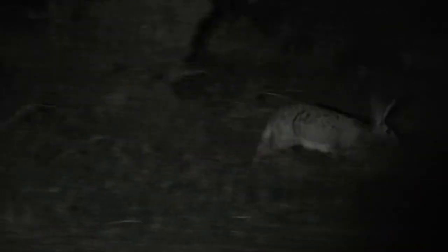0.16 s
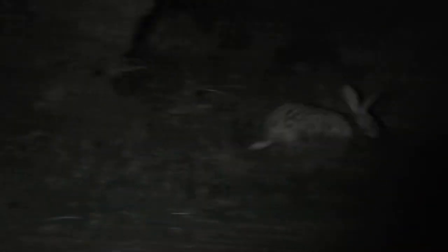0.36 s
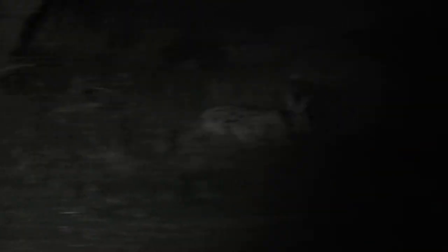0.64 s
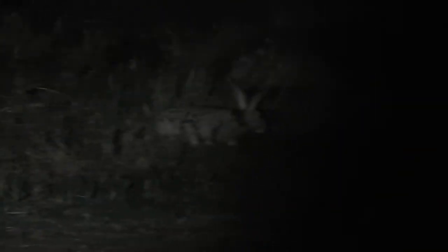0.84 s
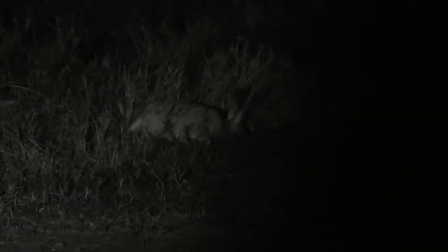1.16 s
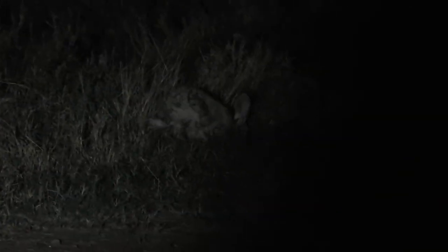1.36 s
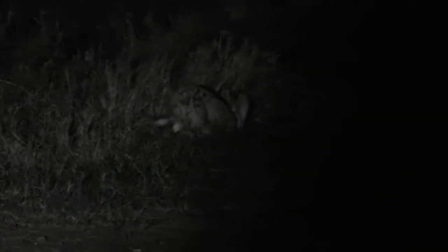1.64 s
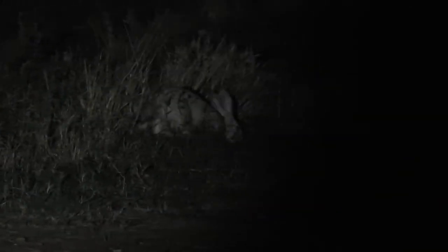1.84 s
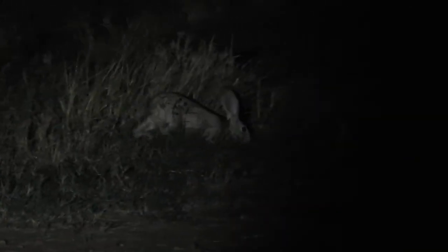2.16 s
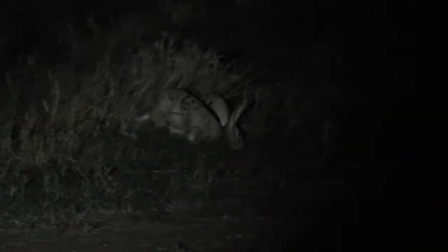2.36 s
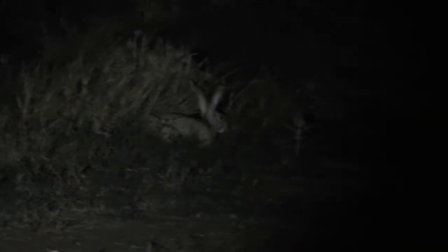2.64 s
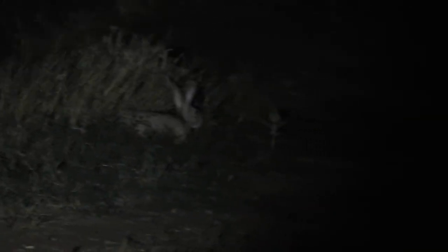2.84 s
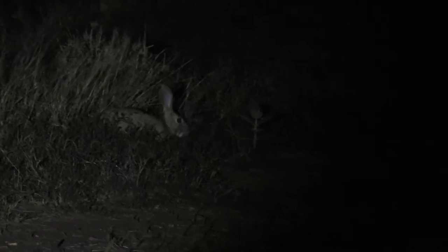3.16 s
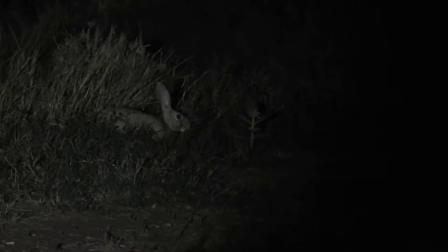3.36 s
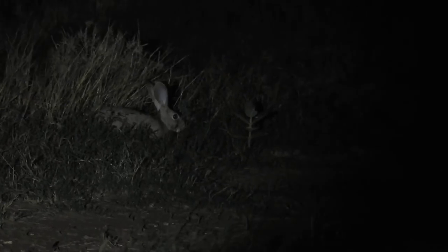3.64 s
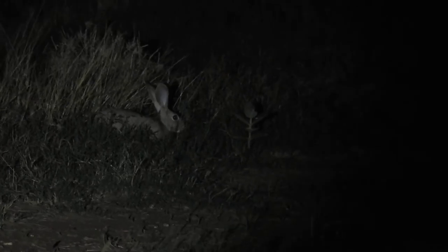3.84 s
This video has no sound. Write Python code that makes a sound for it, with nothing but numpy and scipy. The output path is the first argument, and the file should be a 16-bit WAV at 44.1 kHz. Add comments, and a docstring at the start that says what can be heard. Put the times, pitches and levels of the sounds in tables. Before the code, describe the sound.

Heavy crackling wind thuds on the microphone, with accelerating nightjar chirps and hissing night insects behind.

```python
"""Night in open grassland: from the start gusts buffet two microphone ports and overload them, while insects
hiss and tick in the grass (noise shaped in frequency, and short sagging tones). A nightjar's falling notes,
swept harmonics filtered by fixed throat resonances, speed up into a quick roll; thin squeaks, gliding sines,
come from far off meanwhile. A louder second series speeds up likewise, and one single note ends the scene.
The wind is noise rumble and flutter, with brief thuds and puffs, clipped softly and crackling."""
import sys
import numpy as np
from scipy import signal
from scipy.fft import rfft, irfft
from scipy.io import wavfile
from scipy.ndimage import uniform_filter1d

SR = 44100
rng = np.random.default_rng(int(sys.argv[2]) if len(sys.argv) > 2 else 0)


def bounce(signal):
    """Save signal as a 16-bit WAV file at the path given by the first command-line argument."""
    frames = np.transpose(np.atleast_2d(signal))
    limited = np.clip(frames, -1, 1)
    pcm = np.round(limited * 32767).astype(np.int16)
    wavfile.write(sys.argv[1], SR, pcm)


N = 176400  # samples, 4 s
SWAY_HZ = 24  # upper rate of the slow variations in the wind


def amp(db):
    """Level law: 20 dB is a factor of ten in amplitude."""
    return 10 ** (np.asarray(db) / 20)


def unit(x):
    """Normalisation by mean power: scales to rms 1."""
    return x / np.sqrt(np.mean(x ** 2) + 1e-20)


def read(points, hz):
    """Interpolates a spectral table on a logarithmic frequency axis."""
    f, value = np.transpose(points)
    return np.interp(np.log(hz + 1), np.log(f + 1), value)


def colour(x, points):
    """Linear filtering: multiplies the spectrum by a table of (frequency [Hz], gain [dB])."""
    return irfft(rfft(x) * amp(read(points, np.fft.rfftfreq(N, 1 / SR))), N)


def sway(hz):
    """Low-passed random fluctuation of rms 1, independent at the two ports."""
    f = np.fft.rfftfreq(N, 1 / SR)
    return unit(irfft(rfft(rng.standard_normal((2, N))) / np.sqrt(1 + (f / hz) ** 6), N))


def add(mix, s, sound):
    """Superposition: adds a sound to the mix in place, starting at s seconds."""
    part = mix[max(round(s * SR), 0):][:len(sound)]
    part += sound[:len(part)]


def night():
    """Partially coherent noise: distant air and an insect chorus, correlated between ports by frequency."""
    # spectrum of the night air: (frequency [Hz], relative density [dB per Hz])
    air_spectrum = [(25,-20),(60,-6.5),(110,6.5),(170,-6.5),(280,2),(450,-2.5),(800,-5),(1200,-8),(1750,-10.5),(2400,-16),(3000,-15.5),(3700,-20.5),(4400,-14.5),(5100,-16),(5900,-11),(6600,-11.5),(7200,-16),(7900,-25),(8600,-27),(9500,-25),(10000,-35),(12000,-38.5),(15500,-48.5)]
    # likeness of the two ports: (frequency [Hz], correlation [-1 to 1])
    likeness = [(100,0.79),(270,0.99),(500,0.91),(1200,0.86),(2000,0.61),(3300,0.48),(4500,0.36),(5500,0.017),(6500,-0.27),(9000,-0.49),(12000,-0.12),(15000,-.1)]
    level_db, patch_db = -38, 1.35  # rms level; depth of the chance patches in time and frequency
    hz = np.fft.rfftfreq(1024, 1 / SR)
    a, b, c, d, patches = rng.standard_normal((5, N // 256 + 5, 513))
    patches = uniform_filter1d(patches, size=14, axis=0)
    patches = unit(uniform_filter1d(patches, size=14, axis=1))
    same = np.clip(read(likeness, hz), -1, 1)
    left, other = a + 1j * b, c + 1j * d
    right = same * left + np.sqrt(1 - same ** 2) * other
    z = np.array([left, right])
    z *= amp(read(air_spectrum, hz) + patch_db * patches) / np.sqrt(1.13 + same)
    noise = signal.istft(z.transpose(0, 2, 1), nperseg=1024, noverlap=768)[1][:, :N]
    return amp(level_db) * unit(noise)


def ticks():
    """Frequency-modulated tone bursts: falling insect chirps, near and far, opposite in phase at the ports."""
    # pairs from the nearest insect: (time of the first tick [s], level [dB])
    near_pairs = [(.58,-52),(.76,-53),(1.39,-53),(2.47,-57),(2.67,-53),(3.37,-55),(3.5,-51),(3.69,-52)]
    # the pitches of the far insects: (frequency [Hz])
    far_hz = [8950, 9250, 9540]
    near_hz, pair_gap_s = 9520, .05
    far_per_s, far_db = 28, -51.5  # the loudest far tick; others lie up to 6 dB below
    half_s, sag_hz_per_s, waver_hz = .02, 4000, 40  # half a tick's length; fall of pitch; rms chance detuning
    calls = [(s + k * pair_gap_s, db, near_hz) for s, db in near_pairs for k in range(2)]
    for place, size, pitch in rng.random((int(far_per_s * N / SR), 3)):
        calls.append((place * N / SR, far_db - 6 * size, far_hz[int(pitch * len(far_hz))]))
    out, t = np.zeros(N), np.arange(0, 2 * half_s, 1 / SR)
    for s, db, hz in calls:
        turns = np.cumsum(hz - sag_hz_per_s * (t - half_s)) / SR
        add(out, s - half_s, amp(db) * np.sqrt(2) * np.hanning(len(t)) * np.sin(2 * np.pi * turns))
    # turning the analytic signal shifts every pitch by a small random amount
    waver = np.exp(2j * np.pi * np.cumsum(waver_hz * sway(120)[0]) / SR)
    out = (signal.hilbert(out) * waver).real
    return np.array([-.45 * out, out])


def squeaks():
    """Gliding sinusoids under a half-sine envelope: a small animal far off."""
    # thin squeaks: (time of the middle [s], level [dB], middle pitch [Hz])
    calls = [(1.018,-44,6250),(1.034,-40,4300),(.96,-50,5250)]
    length_s, fall = .02, .08  # fall: share of the pitch lost from start to end
    out, u = np.zeros(N), np.linspace(0, 1, int(length_s * SR))
    for s, db, hz in calls:
        turns = np.cumsum(hz * (1 - fall * (u - .5))) / SR
        tone = np.sin(np.pi * u) * np.sin(2 * np.pi * turns)
        add(out, s - length_s / 2, amp(db) * np.sqrt(2) * tone)
    return np.array([out, 0.52 * out])


def rumble(lumps):
    """Low-frequency turbulence: coloured noise, its own swells partly evened out and a slow sway imposed."""
    # spectrum of the rumble: (frequency [Hz], relative density [dB per Hz])
    spectrum = [(20,-47),(40,-43),(60,-14),(90,-18),(120,-2),(180,3),(235,-4),(310,-6),(450,-25),(700,-34),(1500,-64.5),(4000,-78)]
    evenness, window_s, sway_db = 0.5, 0.031, 3.5  # exponent of the evening; its averaging time; rms sway
    noise = colour(rng.standard_normal((2, N)), spectrum)
    power = uniform_filter1d(abs(signal.hilbert(noise)) ** 2, size=int(window_s * SR))
    even = noise / np.sqrt(abs(power) + 1e-12) ** evenness
    return unit(even * amp(sway_db * lumps))


def flutter(lumps):
    """Amplitude-modulated turbulence: noise made lumpy by slow and fast eddies, then coloured."""
    # spectrum of the flutter: (frequency [Hz], relative density [dB per Hz])
    spectrum = [(20,-21.5),(55,-6.5),(100,-10),(150,3),(280,9),(450,3.5),(700,-4.5),(1200,-15.5),(1700,-25.5),(2200,-39.5),(4000,-42),(9000,-67.5)]
    sway_db, eddy_db, eddy_hz = 3.5, 1, 190  # rms depths; upper rate of the fast eddies
    eddies = amp(sway_db * lumps + eddy_db * sway(eddy_hz))
    return unit(colour(rng.standard_normal((2, N)) * eddies, spectrum))


def puffs():
    """Band-limited noise bursts: brief eddies that rasp across the right port."""
    # sharp eddies: (time [s], level before overload [dB], length from peak to 1/e^2 [s], centre [Hz])
    eddies = [(0.176,-29.5,0.038,860),(.205,-10.5,0.0057,624),(.206,-24,0.004,1100),(0.477,-30.5,0.021,627),(0.524,-36,0.011,830),(0.691,-26.5,0.015,815),(1.174,-22.5,0.023,1050),(1.571,-22.5,0.011,584),(1.777,-15.5,0.0023,990),(1.937,-14,0.0057,600),(1.961,-16.5,0.025,1150),(2.083,-17.5,0.012,1030),(2.176,-17,0.017,750),(2.299,-15,0.008,1050),(2.649,-20,0.014,766),(2.751,-13.5,0.0025,800),(2.857,-34,0.0025,800),(2.948,-14.5,0.0044,735),(2.968,-17.5,.004,990),(3.07,-17,0.028,1280),(3.148,-9.5,0.027,1130),(3.184,-16.5,0.017,1360),(3.279,-19,0.024,1040),(3.339,-26,0.052,794),(3.376,-8.5,0.014,880),(3.537,-19,0.017,895),(3.628,-22,0.028,680)]
    width_octaves, skirt_db = 0.42, -22  # spread of the band; level of the wide skirt around it
    out, t, f = np.zeros(N), np.arange(8192) / SR, np.fft.rfftfreq(8192, 1 / SR)
    for s, db, length, hz in eddies:
        widths = np.log2((f + 1) / hz) / width_octaves
        core = np.exp(-widths ** 2 / 2) / (1 + (f / 1900) ** 10)
        band = core + amp(skirt_db) / (1 + widths ** 4)
        shape = np.exp(-2 * ((t - t.mean()) / length) ** 2)
        burst = irfft(rfft(rng.standard_normal(len(t))) * band) * shape
        add(out, s - t.mean(), amp(db) * burst * np.linalg.norm(shape) / np.linalg.norm(burst))
    return np.array([np.zeros(N), out])


def thuds():
    """Pressure swings of a few cycles under a Gaussian; also returns the share of rumble they displace."""
    # buffets on both ports: (time [s], level before overload [dB], length from peak to 1/e [s], pitch [Hz])
    buffets = [(.055,-13,0.012,225.7),(.108,-11.5,0.011,240.3),(.131,-9.5,0.0088,217),(.535,-10.5,0.011,203.4),(.602,-8,0.0063,188.3),(1.049,-15,0.01,223),(1.157,-7.5,0.017,194.5),(1.205,-7.5,0.0044,193),(1.238,-9,0.0047,213),(1.62,-16.5,0.0061,206),(1.77,-12,0.012,186),(1.872,-6.5,0.0073,188),(2.044,-8,0.013,200),(2.197,-9.5,0.0073,240),(2.343,-8,0.013,172),(2.638,-11.5,0.0133,174),(2.737,-14.5,0.014,166.7),(2.773,-15,0.014,210),(2.897,-7.5,0.0087,193.5),(3.185,-8,0.011,171),(3.237,-8.5,0.013,239),(3.41,-13.5,0.0079,219),(3.51,-12.5,0.0055,189)]
    wander_hz, skew_turns = 14, .2  # rms wander of pitch; largest extra phase at the right port
    out, share, t = np.zeros((2, N)), np.zeros(N), np.arange(N) / SR
    wander = np.cumsum(wander_hz * sway(SWAY_HZ), axis=1) / SR
    for (s, db, length, hz), (start, skew) in zip(buffets, rng.random((len(buffets), 2))):
        near = abs(t - s) < 3 * length
        shape = np.exp(-((t[near] - s) / length) ** 2)
        turns = hz * (t[near] - s) + wander[:, near] - wander[:, [round(s * SR)]] + start
        turns[1] += skew_turns * (2 * skew - 1)
        out[:, near] += amp(db) * np.sqrt(2) * shape * np.sin(2 * np.pi * turns)
        share[near] += shape
    return out, np.minimum(share, 1)


def crackles(drive):
    """Random impulses, likelier as the square of the overload drive, each trailing a decaying noise spray."""
    # spectrum of the snaps: (frequency [Hz], relative gain [dB])
    snap_spectrum = [(200,-3),(800,14.5),(2500,-0.5),(4000,-5),(6000,-22),(15000,-26.5)]
    # spectrum of the spray: (frequency [Hz], relative gain [dB])
    spray_spectrum = [(2000,-12),(5000,-1),(9000,-1),(15000,-9)]
    per_s, decay_s = 900, .004  # rate at full drive; time constant of the spray
    snap_db, spray_db = -41, -62.5  # rms levels over the whole scene
    struck = rng.random((2, N)) < per_s / SR * drive ** 2
    snaps = struck * rng.uniform(-0.77, 1, (2, N))
    decay = signal.lfilter([1], [1, -np.exp(-1 / (decay_s * SR))], abs(snaps))
    spray = decay * rng.standard_normal((2, N))
    return amp(snap_db) * unit(colour(snaps, snap_spectrum)) + amp(spray_db) * unit(colour(spray, spray_spectrum))


def wind():
    """Turbulent pressure at two ports: rumble, thuds, flutter and puffs driven into a saturating capsule."""
    # one table per gust: (time [s], relative rumble level [dB], relative flutter level [dB])
    gusts = [
        [(0.0, -19, -14.5), (0.016, -14, -74), (0.028, -14.5, -34), (0.082, -16, -23), (0.106, -28, -60),
         (0.11, -5.5, -23), (0.162, -23.5, -70), (0.168, -21.5, -16.5), (0.192, -28, -37), (0.206, -20.5, -31),
         (0.218, -20.5, -35), (0.23, -39, -45), (0.264, -32, -55), (0.29, -65, -57), (0.306, -32, -59),
         (0.33, -47, -57)],
        [(0.38, -44, -55), (0.41, -30.5, -38), (0.45, -31, -35), (0.474, -18, -33), (0.49, -32, -43),
         (0.536, -11, -25), (0.554, -13.5, -60), (0.616, -10.5, -37), (0.632, -14, -36), (0.66, -17, -26),
         (0.684, -26, -47), (0.692, -22.5, -29), (0.778, -28.5, -44), (0.788, -34, -24.5), (0.812, -58.5, -55),
         (0.83, -40, -43)],
        [(0.87, -44, -60), (0.918, -26.5, -52), (0.958, -37, -52), (0.968, -30, -53), (0.976, -26, -52),
         (1.04, -23, -16), (1.07, -23, -28), (1.16, -10, -20.5), (1.25, -32, -30.5), (1.264, -60, -33),
         (1.28, -30, -54), (1.318, -32, -40), (1.324, -40, -72.5), (1.338, -64, -51), (1.354, -36, -57),
         (1.4, -51, -61)],
        [(1.45, -59, -68), (1.472, -62, -60), (1.488, -27, -64), (1.51, -26, -45), (1.522, -67, -76),
         (1.53, -69, -50), (1.548, -19.5, -54), (1.572, -18.5, -51), (1.584, -28.5, -59), (1.624, -11, -27),
         (1.64, -26, -64), (1.652, -29, -44), (1.682, -32, -44), (1.692, -27, -43), (1.708, -23, -38),
         (1.72, -49, -57)],
        [(1.74, -27, -26.5), (1.756, -5.5, -26), (1.788, -25, -21.5), (1.884, -9.5, -21), (1.902, -27, -29.5),
         (1.928, -24, -25), (1.955, -11.5, -9.5), (1.976, -7.5, -18), (2.024, -32, -16.5), (2.052, -24, -34),
         (2.078, -22.5, -19), (2.122, -15.5, -22), (2.28, -14, -18.5), (2.352, -18.5, -31), (2.368, -25, -80),
         (2.386, -85, -36), (2.42, -30.5, -51)],
        [(2.49, -44, -47), (2.51, -45, -48), (2.528, -13, -20), (2.552, -43, -41), (2.57, -22, -57),
         (2.592, -30.5, -32.5), (2.632, -9, -35), (2.65, -15, -35), (2.696, -28.5, -36), (2.72, -12.5, -19.5),
         (2.836, -12, -20.5), (2.854, -19, -16.5), (2.91, -8, -26.5), (2.94, -15.5, -54), (2.946, -29.5, -32),
         (2.98, -23, -31)],
        [(3.0, -24, -31), (3.022, -15.5, -16), (3.162, -19, -21), (3.172, -6, -19), (3.232, -11.5, -14),
         (3.244, -17, -23), (3.278, -14.5, -15.5), (3.306, -20, -36.5), (3.314, -23, -37), (3.334, -16.5, -13),
         (3.35, -31, -56), (3.376, -17.5, -27.5), (3.398, -30, -20.5), (3.416, -17.5, -19.5), (3.494, -19, -38),
         (3.5, -36, -29)],
        [(3.52, -17, -20), (3.546, -26, -41), (3.566, -23.5, -45), (3.582, -18, -37), (3.644, -20, -33),
         (3.67, -36, -40), (3.714, -23, -34), (3.746, -38.5, -59), (3.78, -20, -27), (3.82, -34.5, -54),
         (3.842, -19, -45), (3.852, -21, -57), (3.858, -27.5, -31), (3.9, -30.5, -52), (3.982, -24, -28.5),
         (4.0, -23, -48)],
    ]
    breeze_db = -45.5  # relative level of the rumble left between gusts
    rumble_gain_db, flutter_gain_db = 2.5, [1, 6.5]  # flutter: left, right
    displaced = .75  # share of the rumble that a thud replaces at its peak
    overload, knee = 0.77, 3.4  # ceiling amplitude; sharpness of the bend towards it
    s, rumble_db, flutter_db = np.vstack(gusts).T
    t = np.arange(N) / SR
    force = np.hypot(amp(np.interp(t, s, rumble_db)), amp(breeze_db))
    rough = amp(np.interp(t, s, flutter_db))
    lumps = sway(SWAY_HZ)
    buffets, share = thuds()
    air = amp(rumble_gain_db) * force * rumble(lumps) * (1 - displaced * share) + buffets
    air = air + amp(flutter_gain_db)[:, None] * rough * flutter(lumps) + puffs()
    air = air / (1 + abs(air / overload) ** knee) ** (1 / knee)
    return air + crackles(air / overload)


def sweep(pitch_hz, tilt_db):
    """Source and filter: a slightly rough harmonic sweep crosses the fixed resonances of the throat."""
    # harmonics from the fundamental up: (relative level [dB])
    overtones_db = [-3, -18.5, -6.5]
    # throat resonances: (frequency [Hz], gain [dB])
    throat = [(1000,-13),(1170,-7.5),(1320,-11),(1500,-4),(1650,0),(1800,-2),(1900,-6),(2100,1),(2300,-6),(2600,-9),(2900,-20),(4000,-25.5),(5700,-24),(6500,-8),(7100,-11.5),(7800,-17)]
    jitter_share, shimmer_db, rough_s = .03, 2, .0015  # rms pitch and level roughness; its time step
    onset_s, release_s = .003, .004
    t, length = np.arange(len(pitch_hz)) / SR, len(pitch_hz) / SR
    jitter, shimmer = (np.interp(t / rough_s, np.arange(32), row) for row in rng.standard_normal((2, 32)))
    hz = pitch_hz * (1 + jitter_share * jitter)
    phase = 2 * np.pi * np.cumsum(hz) / SR
    voice = 0
    for k, level in enumerate(overtones_db, 1):
        level_db = level + read(throat, k * hz) + tilt_db * (k == 1)  # only the fundamental is tilted
        voice = voice + amp(level_db) * np.sin(k * phase)
    ramp = np.clip(np.minimum(t / onset_s, (length - t) / release_s), 0, 1)
    return np.sqrt(2) * voice * np.sin(np.pi / 2 * ramp) ** 2 * amp(shimmer_db * shimmer)


def rasp(length_s):
    """Band-passed noise under a smooth swell: the soft roughness with which a note opens."""
    # edges of the rasp's band: (frequency [Hz])
    band_hz = [2000, 2750]
    relative_db = -19  # against the level of its note
    size = int(length_s * SR)
    sos = signal.butter(2, band_hz, "band", fs=SR, output="sos")
    band = signal.sosfilt(sos, rng.standard_normal(4096))
    return amp(relative_db) * unit(band)[-size:] * np.hanning(size)


def scatter(sound):
    """Diffuse scattering by grass and bushes: convolution with exponentially decaying noise."""
    echo_db, t60_s, delay_s = -9, .1, .007
    t = np.arange(SR // 2) / SR
    tail = rng.standard_normal((2, len(t))) * amp(-60 * t / t60_s) * (t > delay_s)
    echo = signal.fftconvolve(sound[None], tail / np.linalg.norm(tail[0]), axes=1)[:, :N]
    return sound + amp(echo_db) * echo


def nightjar():
    """Exponential pitch falls crowd into a roll of short arched notes, scattered by the grass and bushes."""
    # falling notes: (time when the pitch passes mid_hz [s], relative level [dB])
    falls = [(.2625,-27),(0.706,-27),(1.0748,-27),(1.21,-26),(1.3064,-27.5),(1.3912,-26.5),(1.4624,-30),(1.529,-30),(1.592,-28.5),(1.651,-28.5),(1.7014,-28.5),(1.7532,-29),(1.8006,-29),(1.844,-30.5),
             (2.142,-24),(2.278,-23),(2.3767,-23),(2.459,-22.5),(2.535,-22),(2.6006,-23),(2.6595,-20.5),(2.715,-22),(2.7703,-28),(2.8184,-23),(2.868,-21),(2.913,-29),(3.978,-25)]
    # tilt of the fundamental away from mid_hz: (time [s], slope [dB per octave]); the second series is rounder
    tilt = [(1.9, -1), (2.1, -13)]
    # arched notes of the closing rolls: (time [s], relative level [dB], highest pitch [Hz])
    roll_notes = [(1.862,-27,1720),(1.880,-27,1800),(1.900,-28.5,1880),(1.921,-26,1880),(2.940,-22,1880),(2.959,-22.5,1820),(2.979,-24.5,1820),(3.000,-22,1880),(3.022,-25,1700)]
    # pitch at even steps through a roll note: (share of the highest pitch)
    arch_shape = [.86, .97, 1, .91, .8, .69]
    mid_hz, end_hz, fall_s, after_mid_s = 1700, 1140, .0217, .015  # fall_s: time constant of the pitch
    roll_s, roll_lead_s, rasp_s = 0.0157, .0075, .0276  # lengths; the lead is from start to listed time
    out = np.zeros(N)
    for (s, db), gap in zip(falls, np.diff([row[0] for row in falls], prepend=0)):
        top_hz = np.interp(gap, [.04, .15], [2400, 2700])  # hurried notes start lower
        lead = fall_s * np.log(top_hz / mid_hz)
        t = np.arange(-lead, after_mid_s, 1 / SR)
        hz = np.maximum(mid_hz * np.exp(-t / fall_s), end_hz)
        tilt_db = np.interp(s, *np.transpose(tilt)) * abs(np.log2(hz / mid_hz))
        add(out, s - lead, amp(db) * sweep(hz, tilt_db))
        add(out, s - lead - rasp_s / 2, amp(db) * rasp(rasp_s))
    steps = np.linspace(0, 1, len(arch_shape))
    arch = np.interp(np.linspace(0, 1, int(roll_s * SR)), steps, arch_shape)
    for s, db, top_hz in roll_notes:
        add(out, s - roll_lead_s, amp(db) * sweep(top_hz * arch, 0))
    return scatter(out)


def scene():
    """Superposition of insects, squeaks, wind and bird at the two ports."""
    return night() + ticks() + squeaks() + wind() + nightjar()


def record(dry):
    """Gain reduction: a limiter ducks the strongest gusts, then come end fades and a low-pass band limit."""
    limit_db, share, recover_db_per_s = -13.5, 0.33, 50  # share: part of the excess level that is removed
    fade_s, edge_hz = .004, 15800
    power_db = 10 * np.log10(abs(uniform_filter1d((dry ** 2).mean(0), size=400)) + 1e-12)
    # peaks are held, then released at a steady rate
    fall = np.arange(N) * recover_db_per_s / SR
    over_db = np.maximum(np.maximum.accumulate(power_db + fall) - fall - limit_db, 0)
    ducked = dry / amp(share * uniform_filter1d(over_db, size=200))
    to_end = np.minimum(np.arange(N), np.arange(N)[::-1])
    faded = ducked * np.sin(np.pi / 2 * np.clip(to_end / (fade_s * SR), 0, 1))
    low_pass = signal.firwin(511, edge_hz, window=("kaiser", 9), fs=SR)
    return signal.oaconvolve(faded, low_pass[None], "same")


dry = scene()
out = record(dry)
bounce(out)
```